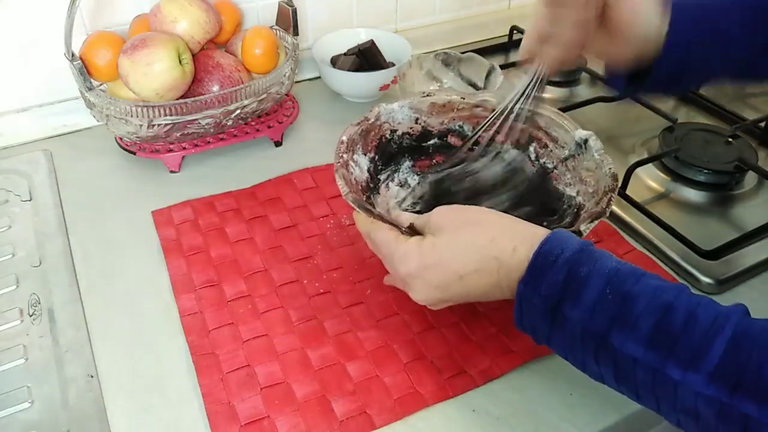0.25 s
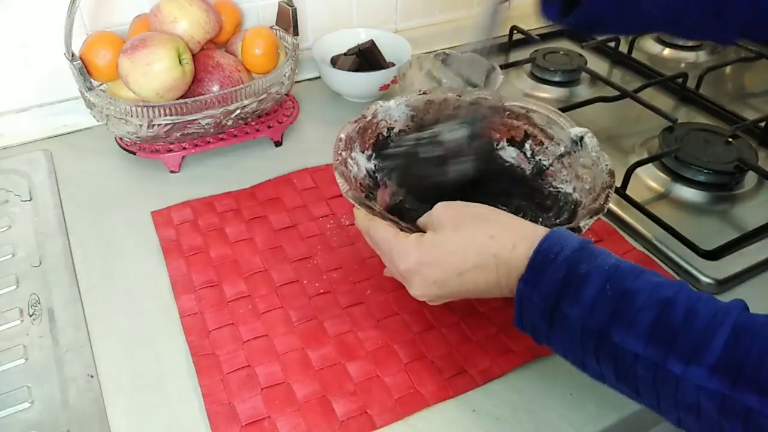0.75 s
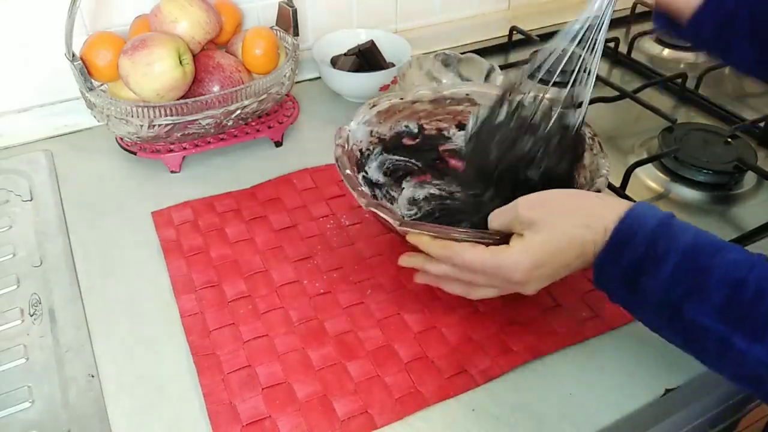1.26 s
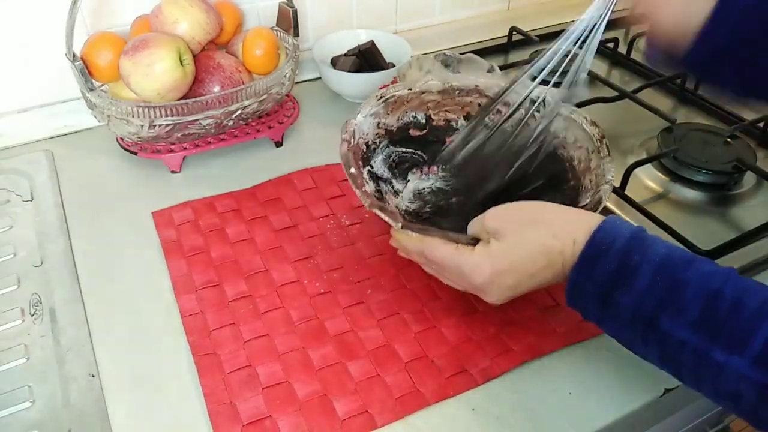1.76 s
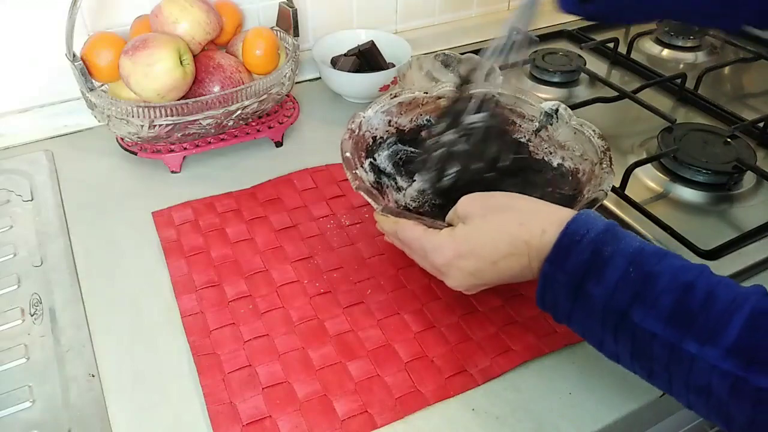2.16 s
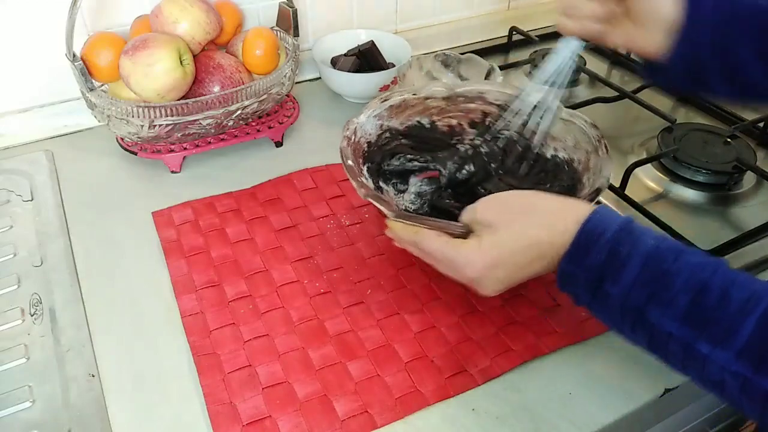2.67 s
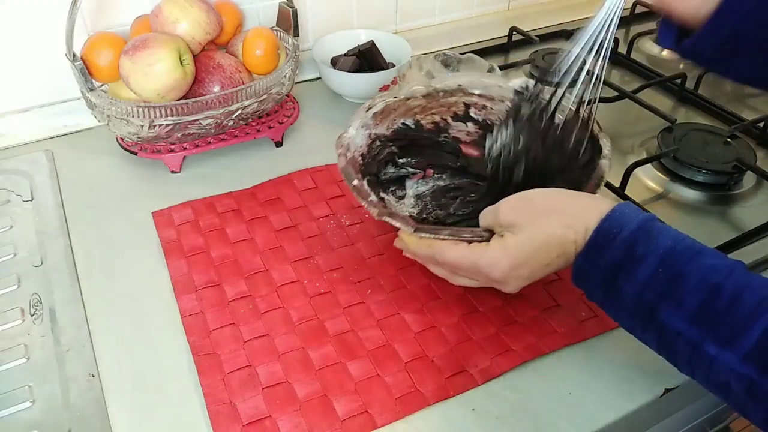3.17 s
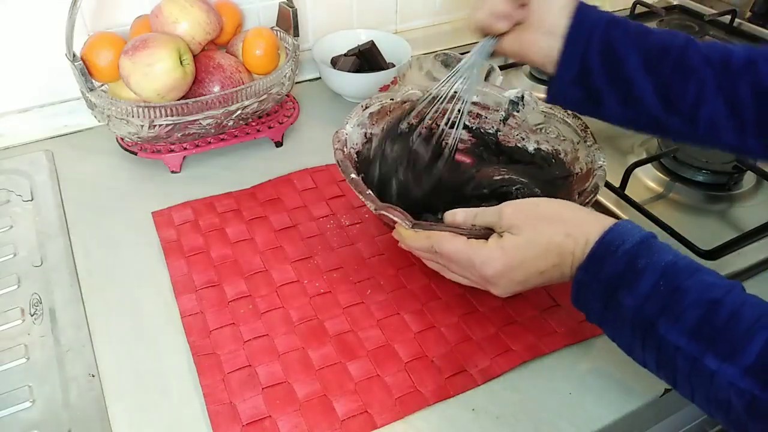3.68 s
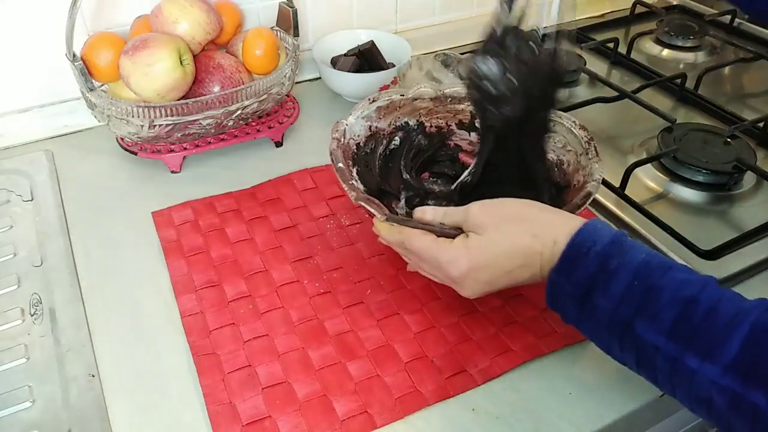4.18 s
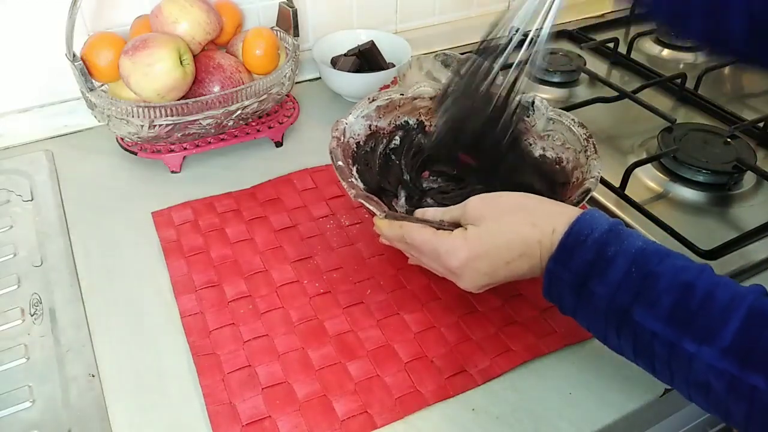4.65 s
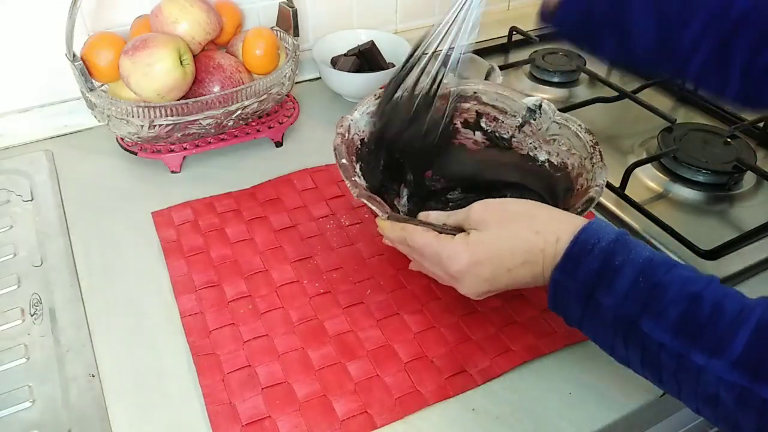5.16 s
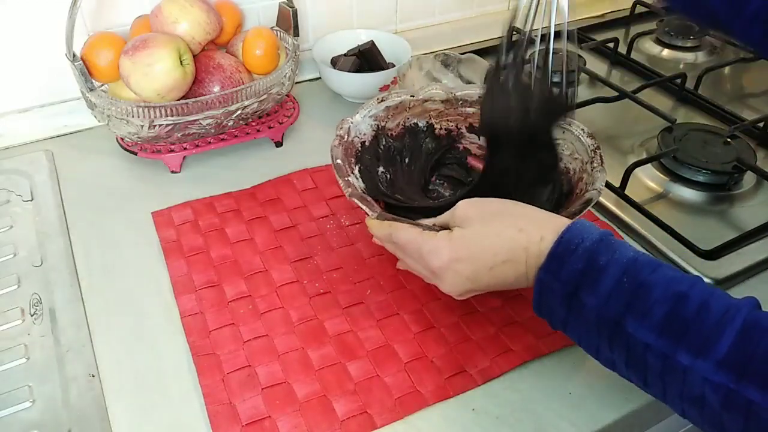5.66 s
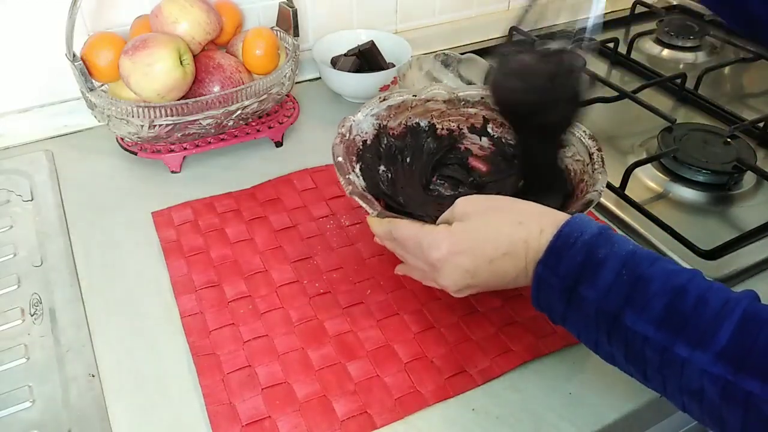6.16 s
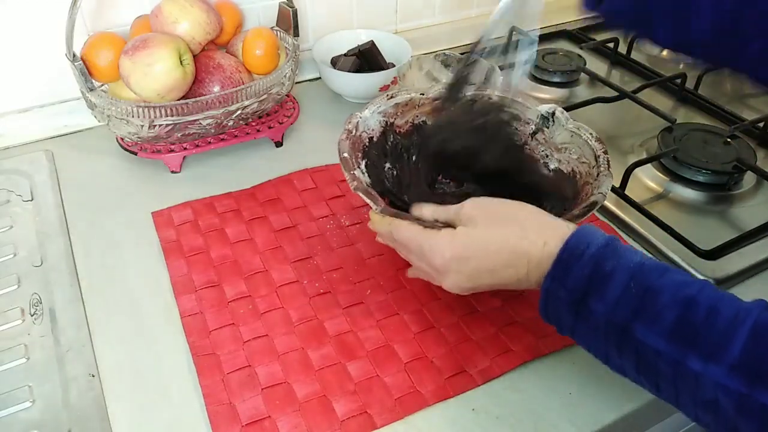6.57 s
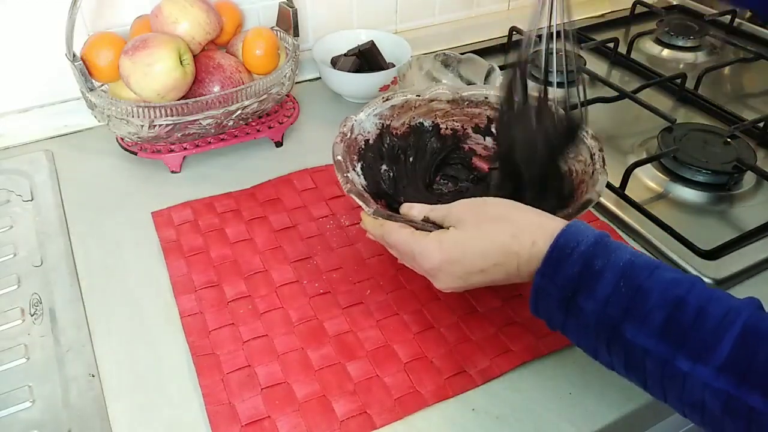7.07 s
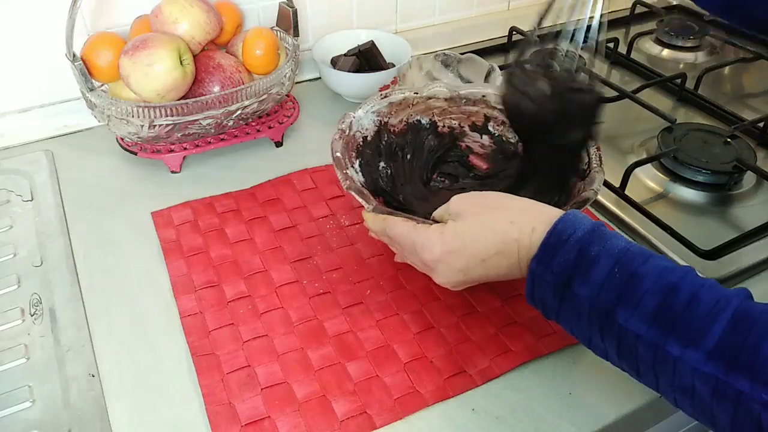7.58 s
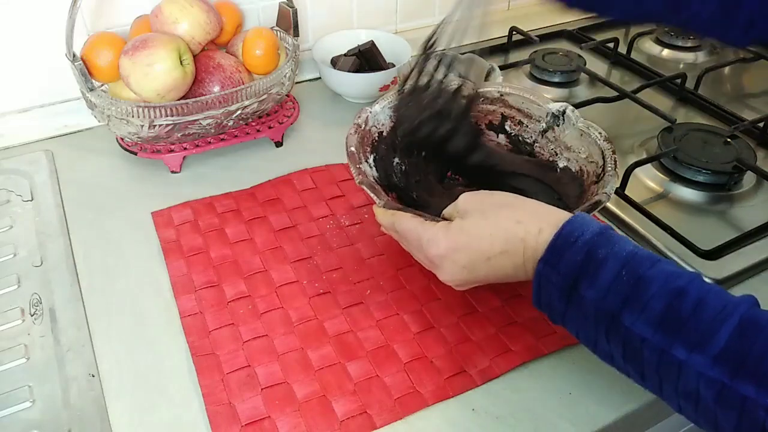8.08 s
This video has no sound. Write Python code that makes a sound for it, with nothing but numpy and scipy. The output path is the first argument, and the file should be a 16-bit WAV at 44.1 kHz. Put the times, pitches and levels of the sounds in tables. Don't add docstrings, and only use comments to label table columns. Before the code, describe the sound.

Close whisking of heavy batter: wires hiss and scrape on glass, then rattle sharply against the bowl in uneven clusters, hardest near six and seven seconds.

```python
import sys
import numpy as np
from scipy import signal
from scipy.fft import rfft, irfft, next_fast_len
from scipy.io import wavfile
from scipy.ndimage import uniform_filter1d, map_coordinates

SR = 44100
rng = np.random.default_rng(int(sys.argv[2]) if len(sys.argv) > 2 else 0)


def pcm_store(signal):
    levels = np.round(np.clip(np.atleast_2d(signal), -1, 1) * 32767)
    wavfile.write(sys.argv[1], SR, levels.astype(np.int16).T)


def linear_from_db(decibels):
    return 10 ** (np.asarray(decibels, float) / 20)


N = 367353


def unit(x):
    return x / np.sqrt(np.mean(x ** 2) + 1e-20)


def peak(x):
    return x / np.max(np.abs(x))


def along(points, hz):
    f, v = np.transpose(points)
    return np.interp(np.log(hz + 1), np.log(f + 1), v)


def wobble(rate):
    coarse = np.arange(0, N + 16, 16)
    knots = rng.standard_normal(int(N * rate / SR) + 5)
    return np.interp(np.arange(N), coarse, map_coordinates(knots, [coarse * rate / SR]))


def filtered(x, response):
    m = next_fast_len(x.shape[-1] + 8192)
    return irfft(rfft(x, m) * response(np.fft.rfftfreq(m, 1 / SR)), m)[..., :x.shape[-1]]


def resonance(hz, centre, width):
    return 1j * hz * width / (centre * centre - hz * hz + 1j * hz * width)


def causal(spectrum, size=1024):
    cepstrum = irfft(np.log(linear_from_db(along(spectrum, np.fft.rfftfreq(size, 1 / SR)))))
    cepstrum[1:size // 2] *= 2
    cepstrum[size // 2 + 1:] = 0
    h = irfft(np.exp(rfft(cepstrum)))[:size // 2]
    return h / np.linalg.norm(h)


# pitch in Hz, left-right likeness from 0 to 1.
LIKENESS = [(60, 1), (250, 0.78), (1000, 0.063), (4000, 0.089), (12000, 0.062)]


def paired(two, spectrum):
    def turn(hz):
        return np.arccos(np.clip(along(LIKENESS, hz), -1, 1)) / 2

    def mix(hz):
        return linear_from_db(along(spectrum, hz)) * [np.cos(turn(hz)), np.sin(turn(hz))]

    mid, side = filtered(two, mix)
    return np.array([mid + side, mid - side])


# pitch in Hz, seconds to fall by 60 dB.
ROOM_DECAY = [(100, 0.99), (400, 0.33), (1100, 0.43), (3000, 0.5), (8000, 0.41), (14000, 0.33)]


def kitchen():
    hz, t, z = signal.stft(rng.standard_normal((2, SR // 2)), SR, nperseg=256)
    fading = z * linear_from_db(-60 * t / along(ROOM_DECAY, hz)[:, None])
    tail = signal.istft(fading, SR, nperseg=256)[1]
    rise = 1 - np.exp(-np.arange(tail.shape[1]) / SR / 0.0012)
    tail = paired(tail * rise, [(100, 0)])
    return tail / np.linalg.norm(tail[0])


def effort(start, length, db, steady_db, sag_db, release_db, rest_db):
    settle_s, attack_s = 0.23, 0.035
    clock = np.arange(0, N / SR + .002, .001)
    t = np.maximum(clock - start[:, None], 0)
    settle = np.maximum(db - steady_db, 0)[:, None] * (1 - np.exp(-t / settle_s))
    release = release_db * np.maximum(t - length[:, None], 0)
    level = db[:, None] - settle - sag_db * t - release
    attack = attack_s * np.clip(linear_from_db(0.4 * (steady_db - db)), .4, 3)
    strokes_gain = linear_from_db(level) * np.clip(t / attack[:, None], 0, 1)
    power = np.sum(strokes_gain ** 2, axis=0) + linear_from_db(rest_db) ** 2
    return np.interp(np.arange(N) / SR, clock, np.sqrt(power))


def rubbing(spectrum, grain_db, lump_db, patchy_db):
    grains = rng.standard_normal((2, N)) * linear_from_db(grain_db * wobble(700))
    z = signal.stft(grains, nperseg=512)[2]
    patches = uniform_filter1d(rng.standard_normal(z.shape[1:]), size=5, axis=0)
    patches = uniform_filter1d(patches, size=7, axis=1)
    grains = signal.istft(z * linear_from_db(patchy_db * unit(patches)), nperseg=512)[1][:, :N]
    lumps = linear_from_db(lump_db * (wobble(9.9) + wobble(35)))
    return unit(paired(grains, spectrum) * lumps)


# start in seconds, length in seconds, wire hiss in dB, push on the counter in dB.
SWEEPS = [(-.05, 0.065, -56, -55), (.25, 0.25, -57, -61.5), (0.567, 0.36, -56, -32.5),
          (0.929, 0.35, -47, -45.5), (1.26, 0.36, -59, -56.5), (1.573, 0.36, -55.5, -39.5),
          (1.884, 0.21, -57.5, -59.5), (2.322, 0.32, -56, -57), (2.553, 0.3, -58.5, -77),
          (3.079, 0.26, -55.5, -54.5), (3.347, 0.1, -56.5, -52), (3.664, 0.09, -62, -59),
          (3.754, 0.25, -48, -49.5), (4.074, 0.12, -54.5, -55.5), (4.19, 0.11, -64.5, -70),
          (4.399, 0.41, -52.5, -34.5), (4.762, 0.14, -55.5, -56.5), (5.102, 0.16, -63, -65.5),
          (5.246, 0.39, -49, -46), (5.64, 0.095, -66.5, -70), (5.946, 0.29, -39, -28.5),
          (6.3, 0.28, -56.5, -51), (6.755, 0.26, -50.5, -39.5), (7.072, 0.079, -63, -79),
          (7.358, 0.3, -42, -39.5), (7.742, 0.25, -51, -42), (8.183, .2, -52.5, -53)]


def hissing():
    s, length, hiss_db, _ = np.transpose(SWEEPS)
    return effort(s, length, hiss_db, steady_db=-53.5, sag_db=16.5, release_db=151.5, rest_db=-87)


# multiple of the shaft speed, level in dB.
HUM = [(1, -83), (2, -70), (3, -67), (4, -72.5), (5, -81), (6, -81), (7, -84)]
# multiple of the shaft speed, level in dB, time it is strongest in seconds, seconds to be 6 dB down.
WHINE = [(43, -12, 2.2, 1.2), (44, -3, 2.3, 1.5), (45, -4, 1.8, 2.2), (46, 1.5, 4, 40), (47, -8, 4.5, 1.6)]
# time in seconds, level in dB.
WHINE_LEVEL = [(0, -72.5), (1.3, -70.5), (2.7, -72), (3.6, -74), (4.6, -76.5), (4.71, -80), (4.8, -73),
               (5.2, -79), (5.9, -76.5), (6.4, -80), (6.56, -73), (7.3, -76.5), (8.33, -72.5)]


def fridge():
    turns = 49.08 * np.arange(N) / SR
    t = np.arange(N) / SR
    hum = 0
    for order, db in HUM:
        hum = hum + linear_from_db(db + 2 + 2.2 * wobble(7)) * np.sin(2 * np.pi * (order * turns + rng.random()))
    whine = 0
    for order, db, strongest, span in WHINE:
        load_db = np.maximum(-6 * ((t - strongest) / span) ** 2, -10)
        phase = order * turns + .1 * rng.random() + np.array([[.08], [-.08]])
        whine = whine + linear_from_db(db + 3.5 + load_db + 1.2 * wobble(11)) * np.sin(2 * np.pi * phase)
    air = np.array([wobble(129), wobble(129)])
    whine = whine + linear_from_db(-4.5 + 5.5) * air * np.sin(2 * np.pi * 46.3 * turns)
    s, db = np.transpose(WHINE_LEVEL)
    whine_db = np.interp(t, s, db) + 0.25 * (20 * np.log10(hissing()) + 57)
    flutter_db = .8 * wobble(27) + 1.5 * wobble(5)
    return hum * linear_from_db(0.57 * (whine_db + 75)) + whine * linear_from_db(whine_db + 3.5 + flutter_db)


# start in seconds, length in seconds, level in dB.
FOLDS = [
    (.93, 0.16, -62),
    (3.223, 0.28, -56.5),
    (3.498, 0.12, -69),
    (5.96, 0.18, -49.5),
    (7.76, 0.19, -57),
]
# pitch in Hz, level in dB.
FOLD_COLOUR = [(300, -31), (420, -2), (700, 0.5), (900, -1), (1330, 0), (1450, -31.5)]


def folds():
    s, length, db = np.transpose(FOLDS)
    gain = effort(s, length, db, steady_db=-56, sag_db=11.5, release_db=144, rest_db=-100)
    return gain * rubbing(FOLD_COLOUR, grain_db=1.5, lump_db=1.6, patchy_db=1.5) * linear_from_db([[1.1], [-1.1]])


# start in seconds, length in seconds, scrape on glass (or upper bowl sound) in dB, drag of
# batter (or lower bowl sound) in dB.
RUBS = [(-.05, 0.11, -65.5, -65.5), (0.24, 0.18, -61.5, -57.5), (0.573, 0.34, -54, -46),
        (0.919, 0.23, -50, -65), (1.28, 0.17, -78, -64.5), (1.561, 0.21, -55, -48.5),
        (1.836, 0.052, -56.5, -63), (1.936, 0.049, -62, -63), (2.345, 0.17, -67, -62),
        (2.53, 0.12, -59, -61.5), (2.758, 0.12, -82, -79.5), (5.796, 0.1, -92, -72.5),
        (7.12, 0.16, -96.5, -84), (3.07, 0.2, -56, -63), (3.297, 0.39, -69.5, -62),
        (3.718, 0.3, -56, -52.5), (4.397, 0.28, -59, -51.5), (4.762, 0.12, -63, -63),
        (5.269, 0.31, -58.5, -54), (5.95, 0.49, -39, -37), (6.311, 0.29, -51, -52),
        (6.766, 0.21, -58.5, -60), (7.358, 0.31, -50.5, -41.5), (7.737, 0.33, -56, -34.5),
        (8.178, 0.21, -65, -51)]
# pitch in Hz, level in dB.
HISS = [(1500, -43), (2500, -1), (4000, -1.5), (6000, -0.5), (8000, -1.5), (10500, -9), (13000, -27),
        (16000, -28.5)]
SCRAPE = [(600, -32), (950, 1), (1300, 0), (1900, -2), (2700, -3.5), (4000, -25.5)]
DRAG = [(280, -26), (390, 2.5), (540, 4), (740, 2), (870, 0.5), (1100, -35.5)]
PUSH = [(25, -23), (55, -3), (110, -6), (200, -7), (330, -4), (450, -36)]


def strokes():
    s, length, _, push_db = np.transpose(SWEEPS)
    rock = effort(s, length, push_db, steady_db=-54.5, sag_db=12.5, release_db=68.5, rest_db=-69)
    s, length, scrape_db, drag_db = np.transpose(RUBS)
    glass = effort(s, length, scrape_db, steady_db=-62.5, sag_db=17.5, release_db=214.5, rest_db=-89.0)
    batter = effort(s, length, drag_db, steady_db=-61.5, sag_db=17.5, release_db=196.0, rest_db=-89.5)
    hiss = linear_from_db(-5.5) * hissing() * rubbing(HISS, grain_db=1.5, lump_db=0.58, patchy_db=2.5)
    scrape = linear_from_db(2.5) * glass * rubbing(SCRAPE, grain_db=1.5, lump_db=1.8, patchy_db=2.0)
    drag = linear_from_db(0.9) * batter * rubbing(DRAG, grain_db=2.5, lump_db=1.78, patchy_db=2.5)
    push = linear_from_db(-3.5) * rock * rubbing(PUSH, grain_db=2.0, lump_db=3.0, patchy_db=2.5)
    return hiss + (scrape + drag) * linear_from_db([[1.1], [-1.1]]) + push


# time in seconds, pitch in Hz, level in dB, seconds
# to fall by 60 dB.
SHORT_TONES = [(7.738, 303, -16, 0.071), (7.372, 300, -15.5, 0.11), (1.4, 698, -56.5, 0.11),
               (1.312, 550, -50.5, 0.17), (1.322, 1320, -59, .06), (1.1, 1400, -63, 0.042),
               (3.092, 1225, -28.5, 0.02), (5.945, 850, -21, 0.11), (3.76, 1130, -43, 0.1),
               (4.77, 552, -33.5, 0.04), (4.77, 1210, -35, 0.025), (5.343, 1200, -39.5, 0.081),
               (5.885, 6950, -77, .1), (8.196, 2060, -39, 0.029), (8.228, 1904, -48.5, 0.12),
               (.248, 299, -33.5, 0.14), (.248, 704, -39, .1), (.247, 905, -37, 0.073), (.5, 555, -61, .3),
            (.563, 680, -36, 0.091), (.57, 320, -34, .15), (1.55, 787, -35, .05),
            (1.561, 300.4, -29.5, 0.16), (1.561, 497, -25.5, 0.048), (1.561, 805, -26, 0.073),
            (1.561, 1250, -31.5, 0.052), (1.561, 2205, -36.5, 0.081), (6.314, 353, -27.5, 0.076),
            (6.314, 545, -28, 0.036), (6.314, 1107, -25, 0.032), (6.314, 1665, -21.5, 0.021),
            (6.332, 349, -26.5, 0.083), (7.356, 752, -23.5, 0.033), (7.356, 1230, -22.5, 0.032),
            (7.371, 370, -18, 0.084), (7.372, 691, -28, 0.12), (7.44, 289, -32, 0.25),
            (7.738, 518, -19, 0.039), (7.738, 706, -20, 0.043), (7.738, 1230, -23.5, 0.037),
            (7.755, 300, -21, 0.2), (8.18, 1220, -53.5, .04), (8.22, 114, -33, 0.34),
            (8.225, 507, -41, 0.053),
               (.568, 915, -33, .12), (.568, 581, -35, .08), (5.924, 1800, -30, .015),
             (5.924, 2300, -32.5, .012), (5.95, 743, -31, .3), (5.95, 258, -28, 0.36),
             (5.95, 991, -32.5, .3), (5.945, 124, -23, .14), (5.945, 1340, -29, .08), (7.38, 264, -29, .4),
             (7.745, 1340, -32, 0.062), (7.745, 786, -31.5, .2), (7.74, 380, -19.5, .06),
             (1.132, 8200, -50, 0.019), (5.348, 8200, -49, .03), (4.41, 376, -27, .1),
             (4.41, 300, -32, .12), (2.03, 550, -66, .4), (5.95, 2297, -38, .25)]


def smacks():
    out, t = np.zeros((2, N + SR)), np.arange(SR // 4) / SR
    for s, hz, db, t60 in SHORT_TONES:
        lag, lean = rng.standard_normal(2)
        side = np.array([[.5], [-.5]]) * min(hz / 600, 1)
        tone = np.sin(2 * np.pi * hz * t + 0.9 * lag * side) * (1 - np.exp(-t / 0.00074))
        at = round(s * SR)
        out[:, at:at + len(t)] += linear_from_db(db + 2.5 * lean * side - 60 * t / t60) * tone
    room = signal.fftconvolve(out[:1], kitchen(), axes=1)[:, :N]
    return out[:, :N] + linear_from_db(-5.0) * room


# time in seconds, level in dB, direction of the push, left over right in dB.
CRACKS = [(0.5646, -18, 1, -4.5), (.567, -15, -1, 4), (1.5644, -29, -1, -1.5), (4.411, -23, -1, 1),
          (5.9353, -11, 1, 0), (5.943, -8, -1, 1), (5.355, -34.5, 1, 0), (1.5527, -28, 1, 0),
          (7.358, -20, 1, 2), (7.3703, -11.5, 1, 3), (7.7386, -7, 1, 2)]
# pitch in Hz, level in dB.
CRACK_COLOUR = [(150, -16), (500, -3.5), (1500, -1), (3000, -6), (6000, -6.5), (10000, -10), (15000, -22)]


def cracks():
    push = np.zeros((2, N))
    for s, db, way, pan_db in CRACKS:
        push[:, round(s * SR)] = np.sign(way) * linear_from_db([db + pan_db / 2, db - pan_db / 2])
    click = signal.fftconvolve(push, peak(causal(CRACK_COLOUR))[None], axes=1)[:, :N]
    return click + linear_from_db(-8) * signal.fftconvolve(click[:1], kitchen(), axes=1)[:, :N]


# time in seconds, tick in dB, bowl knock in dB, counter thump in dB, slide-in in dB.
HITS = [(.141, -53, -7, 2, -4), (0.2396, -40, -2, -12, -2.5), (0.2476, -32, -6, 0.5, -21),
        (0.5598, -14, -8.5, -7, -22), (0.5637, -10, -13.5, -32, -43), (1.5497, -33.5, 7, -20, -22),
        (1.5609, -18, -11, -21.5, -17.5), (3.0902, -24, -6, -45, -9), (4.404, -24.5, -12, -11, 4.5),
        (4.4084, -19.5, -5, -7, -29), (5.3439, -38, 2, -1.5, -5), (5.9234, -27, -4, -26, -40),
        (5.9347, -10, -8, -14, -30), (5.9418, -6, -15.5, -21.5, -22), (6.3137, -17.5, -9, -12.5, -11),
        (6.332, -27, -6.5, -6.5, -29), (6.7565, -44, 1, 16.5, -9), (6.946, -40, -15, -15, -2.5),
        (7.3435, -38.5, -2, -11, -23.5), (7.349, -27.5, -9.5, -21, -35), (7.3557, -17, -7, -19, -24),
        (7.37, -9, -10.5, -10, -16), (7.737, -12, -4, -11.5, -14), (7.741, -10, -16, -34, -40)]
# time in seconds, tick in dB, bowl knock in dB, counter thump in dB, rise in milliseconds.
BUMPS = [(.932, -47, -15, -9.5, 9.9), (1.133, -48, -37, -32.5, 5.7), (1.8546, -38, -33, -27.5, 6.3),
         (1.861, -36, -27, -19, 7.5), (2.957, -56, -9, 3, 8), (3.07, -51, -12, -26.5, 5.6),
         (3.385, -53, -6.5, -23, 1.9), (3.739, -48, 2, -1.5, 7.4), (3.871, -39.5, 2, -7, 7.5),
         (4.379, -45.5, 6, -18, 6.3), (4.768, -35.5, -2, -31, 8.6), (5.2339, -44, -6.5, -25.5, 2.7),
         (5.268, -46.5, -18.5, 16, 5.4), (5.9158, -50, -32.5, 3, 0.87), (6.565, -47.5, -22.5, 5, 5),
         (6.66, -55, -23, -0.5, 5.5), (8.1797, -44, -7, -15, 2.1), (8.222, -37, -9.5, -3.5, 2.2),
         (.551, -37.5, 2, -25, 6),
    (1.541, -42, 4, -24, 5.5),
    (2.622, -50, 2, -16, 5.3),
    (4.37, -51, 2, -26.5, 5),
    (4.392, -30, -5.5, -25, 4),
    (7.717, -40.5, 1.5, -25, 6.2),
]
# time in seconds, tick in dB.
WIRE_TICKS = [(.42, -55), (1.403, -55), (2.717, -47.5), (2.82, -51), (2.8935, -57.5), (2.93, -62),
              (3.0462, -46.5), (4.116, -55), (4.15, -53), (3.645, -60), (5.72, -63), (7.199, -43),
              (7.2966, -48.5)]


def contacts():
    hard = [(*row, 1.92, slide_db) for *row, slide_db in HITS]
    soft = [(*row, -9) for row in BUMPS]
    wire_on_wire = [(s, db, -38.5, -20, 3.1, -23) for s, db in WIRE_TICKS]
    return hard + soft + wire_on_wire


def ring(modes, t, scatter_db, spread):
    hz, db, t60 = np.transpose(modes)[:, :, None]
    luck = rng.standard_normal((4, len(modes), 1))
    level = linear_from_db(db + scatter_db * luck[0] - 60 * t / t60)
    tones = level * np.sin(2 * np.pi * hz * (1 + 0.019 * luck[1]) * t)
    return peak(np.sum(tones * (1 + spread * luck[2:]), axis=1))


# pitch in Hz, level in dB, seconds to fall by 60 dB.
BOWL = [(306.8, -4.5, 0.13), (384, -4, 0.077), (500, -13.5, 0.029), (559, -10, 0.12), (676, -7, 0.067),
        (740, -3.5, 0.029), (849.5, -7.5, 0.068), (1070, -6, 0.026), (1230, -6.5, 0.032),
        (1280, -13.5, 0.068), (1848, -9.5, 0.041), (1994, -13.5, 0.008), (2260, -12.5, 0.013)]
COUNTER = [(101, -10, 0.35), (122, 3.5, 0.12), (157.6, -4, 0.13), (231, -6.5, 0.1)]
# pitch in Hz, level in dB.
TICK_COLOUR = [(600, -25), (1500, -3), (2500, -2.5), (3900, -10.5), (5500, -5.5), (8000, -5.5),
               (11000, -12.5), (15000, -28.5)]
CLACK_COLOUR = [(120, -33), (300, -3.5), (500, -1), (800, -6.5), (1300, -12.5), (2400, -16.5), (4000, -28)]


def blows():
    before = SR // 20
    t = np.arange(-before, SR // 6) / SR
    after = np.maximum(t, 0)
    out = np.zeros((2, N + 2 * SR))
    bright, dull = causal(TICK_COLOUR)[None], causal(CLACK_COLOUR)[None]
    tails = [kitchen() for _ in range(6)]
    for k, (s, db, knock_db, thump_db, rise_ms, slide_db) in enumerate(contacts()):
        rise = max(rise_ms, .3) / 1000
        slide = linear_from_db(slide_db + 930 * t) * (t < 0) * np.clip((t + 0.028) / 0.0071, 0, 1)
        since = np.maximum(t - rise, 0)
        blow = linear_from_db(-60 * since / (0.0094 + 5 * rise))
        bounces = linear_from_db(-12.5 - 60 * since / 0.15)
        press = np.clip(t / rise, 0, 1) ** 0.58 * (blow + bounces)
        force = rng.standard_normal((5, len(t))) * (slide + press)

        rattle = np.array([force[0], .5 * force[0] + 2.8 * force[1]])
        tick = signal.fftconvolve(rattle, bright, axes=1)[:, :len(t)]
        thin = np.clip((-knock_db - 28.0) / 8, 0, 1)
        tick = (1 - thin) * tick + thin * np.diff(tick, 4, prepend=0 * tick[:, :4])
        tick = tick * np.linalg.norm(slide + press) / np.linalg.norm(tick, axis=1, keepdims=True)
        tick = linear_from_db(db - 13.0) * tick

        bowl = ring(BOWL, t[before:], scatter_db=4.0, spread=0.51)
        glass = signal.fftconvolve(bowl, force[2:3], axes=1)[:, :len(t)]
        clack = signal.fftconvolve(force[3] + 0.93 * force[3:][::-1], dull, axes=1)[:, :len(t)]
        knock = peak(peak(glass) + linear_from_db(-2) * peak(clack))
        knock = linear_from_db(db + knock_db + 2.5) * knock * linear_from_db([[1.5], [-1.5]])

        counter = ring(COUNTER, after, scatter_db=4.0, spread=0.21)
        thump = linear_from_db(db + thump_db) * peak(counter * (1 - np.exp(-after / 0.0056)))

        at = round(s * SR) - before
        out[:, at:at + len(t)] += tick + knock + thump
        sent = linear_from_db(-5.0) * tick[:1] + linear_from_db(-3.5) * knock[:1] + linear_from_db(-6.0) * thump[:1]
        wet = signal.fftconvolve(sent, tails[k % len(tails)], axes=1)
        out[:, at:at + wet.shape[1]] += wet
    return out[:, :N]


# pitch in Hz, width in Hz, level in dB.
WIRE_LOOPS = [(5600, 110, -2.5), (6380, 90, -1.5), (7150, 60, 1), (7410, 41, 3.5), (7850, 50, 2),
              (8300, 60, 2), (8600, 70, -0.5), (9050, 53, 0), (9500, 68, -2)]


def wires(x):
    return filtered(x, lambda f: 0.88 + sum(linear_from_db(db) * resonance(f, c, w) for c, w, db in WIRE_LOOPS))


def scene():
    return fridge() + folds() + strokes() + smacks() + cracks() + wires(blows()) / 0.94


# pitch in Hz, width in Hz, level in dB.
PORTS = [
    (8410, 1295, 13),
    (7370, 1300, 6.5),
]
# pitch in Hz, left over right in dB.
LEAN = [(100, .5), (250, 4), (450, 1.5), (800, -.5), (2400, 1.5), (4500, -1.5), (8000, -1.5), (13000, 5.5)]


def microphones(dry):
    def response(hz):
        whistle = np.array([1 + linear_from_db(db) * resonance(hz, c, w) for c, w, db in PORTS])
        balance = linear_from_db(along(LEAN, hz) * [[.5], [-.5]])
        return whistle * balance / (1 + (47 / (hz + 1)) ** 4)

    return np.clip(filtered(dry, response), -.95, .95)


# pitch in Hz, level in dB.
FAINTEST = [(400, -125), (1000, -114), (2750, -102), (3400, -119), (3900, -111), (4500, -118), (7000, -114),
            (11000, -104), (13800, -101), (14400, -67.5)]


def muted(x, margin_db, depth_db):
    hz, _, z = signal.stft(x, SR, nperseg=2048)
    power = np.abs(uniform_filter1d(np.mean(np.abs(z) ** 2, axis=0), size=3, axis=1))
    band = np.arange(len(hz)) // 8
    level = 10 * np.log10(np.add.reduceat(power, np.arange(0, len(hz), 8)) / 8 + 1e-20)[band]
    around = 10 * np.log10(np.abs(uniform_filter1d(power, size=200, axis=0)) + 1e-20)
    around = around - margin_db - 40 * (hz < 2450)[:, None]
    around = around + 2.2 * (np.abs(hz - 3600) < 1100)[:, None]

    mood = 4 * rng.standard_normal((band[-1] + 1, z.shape[2] // 4 + 1))
    mood = mood[band][:, np.arange(z.shape[2]) // 4]
    total = 10 * np.log10(power[len(hz) // 16:].sum(axis=0) + 1e-20)
    mood = mood - 3 * np.maximum(total - np.roll(total, 3) - 6, 0)

    beside = (np.abs(hz - 2070) < 50) | (np.abs(hz - 2480) < 55)
    whine_level = level[np.argmin(np.abs(hz - 2258))]
    around = np.where(beside[:, None], np.maximum(around, whine_level - 10), around)

    floor = along(FAINTEST, hz)[:, None] + np.maximum(mood, -6)
    excess = level - np.maximum(floor, around + mood)
    gain = linear_from_db(-depth_db / (1 + np.exp(np.clip(excess / 0.14, -30, 30))))
    top = (hz < 15800)[:, None]
    return signal.istft(z * top * gain, SR, nperseg=2048)[1][:, :N]


def low_pass(x):
    return signal.sosfilt(signal.butter(12, 15790, fs=SR, output="sos"), x)


def record(dry):
    mix = muted(microphones(dry), margin_db=9.5, depth_db=28)
    return low_pass(mix)


dry = scene()
out = record(dry)
pcm_store(out)
```